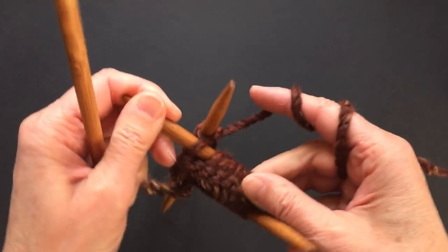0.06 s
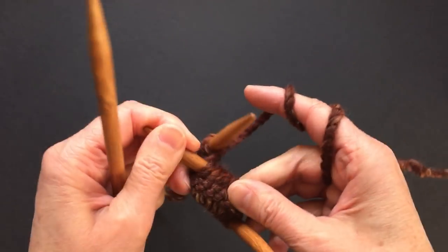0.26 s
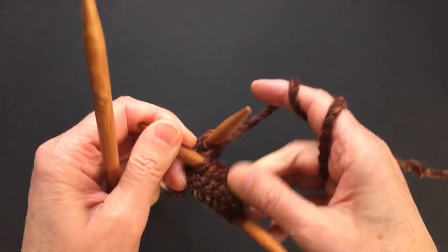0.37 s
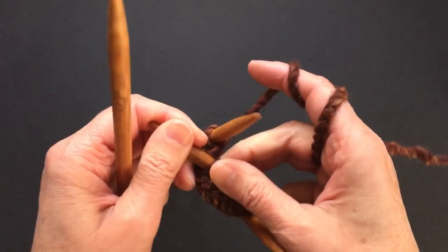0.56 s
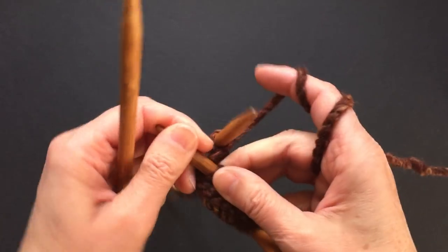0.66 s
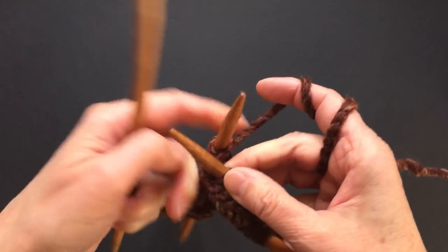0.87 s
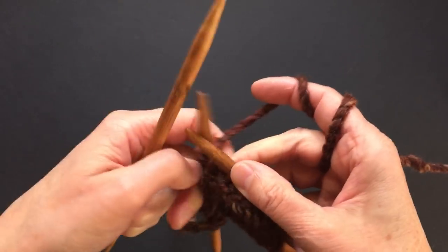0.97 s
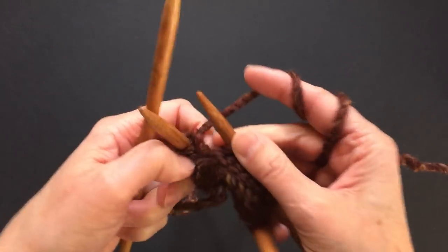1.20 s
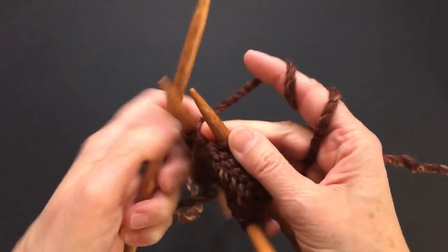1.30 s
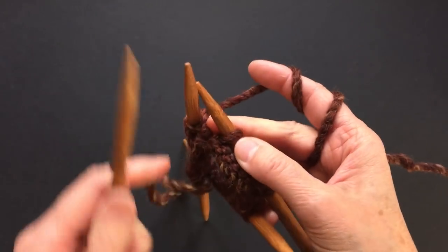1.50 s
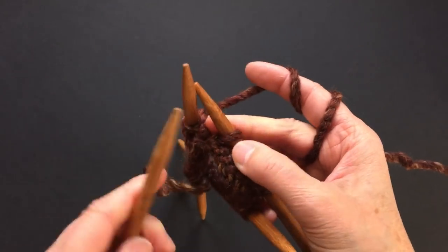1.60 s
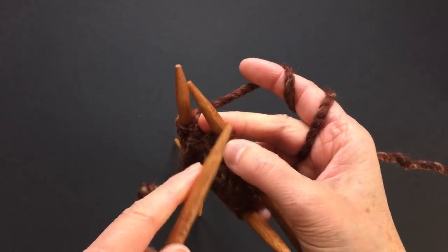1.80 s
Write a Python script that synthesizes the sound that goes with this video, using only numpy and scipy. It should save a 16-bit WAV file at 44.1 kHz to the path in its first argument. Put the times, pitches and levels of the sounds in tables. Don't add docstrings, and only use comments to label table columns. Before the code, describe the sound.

Wooden knitting needles, close to the microphone in a quiet room with faint low hum. Near silence, then clicks at 0.2 to 0.3 seconds with a strong yarn hiss and scrape. Small ticks near 0.47, a sharp knock at 0.7, rapid rattle to 0.82. Thinner, brighter taps around 1.07 and 1.13, dense scraping chatter with soft hand bumps from 1.33 to 1.45, a crisp knock at 1.57, then quiet.

```python
import sys
import numpy as np
from scipy import signal
from scipy.fft import rfft, irfft
from scipy.io import wavfile

SR = 44100
rng = np.random.default_rng(int(sys.argv[2]) if len(sys.argv) > 2 else 0)


def attenuation_scalar(level_db):
    decades = np.asarray(level_db, float) / 20
    return 10 ** decades


def transcribe(u):
    v = np.clip(np.atleast_2d(u).T, -1, 1)
    q = np.round(v * 32767).astype(np.int16)
    wavfile.write(sys.argv[1], SR, q)


N = 81585


def rms_one(x):
    return x / np.sqrt(np.mean(x ** 2) + 1e-24)


def ring(force, hz, t60_s):
    r = attenuation_scalar(-60 / (t60_s * SR))
    w = 2 * np.pi * hz / SR
    return signal.lfilter([0, np.sin(w)], [1, -2 * r * np.cos(w), r * r], force + 1e-18)


def narrow(hz, width_hz):
    t60_s = np.log(1000) / np.pi / width_hz
    once = ring(rng.standard_normal(N + SR), hz, t60_s)
    return rms_one(ring(once, hz, t60_s)[SR:])


def drift(rate_hz):
    r = np.exp(-2 * np.pi * rate_hz / SR)
    return rms_one(signal.lfilter([1], [1, -2 * r, r * r], rng.standard_normal(N + SR))[SR:])


def coloured(spectrum):
    hz, db = np.transpose(spectrum)
    log_hz = np.log(np.fft.rfftfreq(N, 1 / SR) + 1)
    gain = attenuation_scalar(np.interp(log_hz, np.log(hz), db, left=-90))
    return rms_one(irfft(rfft(rng.standard_normal(N)) * gain, N))


# (time [s], level [dB])
HUM_LEVEL = [(0, -71), (.2, -66.5), (0.402, -81.5), (0.548, -59), (.65, -69.5), (0.749, -68.5), (.95, -67),
             (1.102, -99), (1.3, -60.5), (1.551, -66.5), (1.85, -67.5)]


def hum():
    hum_hz, width_hz, skirt_db, wander_rad = 117.9, 1.8, -55.5, 0.56
    t = np.arange(N) / SR
    tone = np.sqrt(2) * np.sin(2 * np.pi * hum_hz * t + wander_rad * drift(1.0))
    level_db = np.interp(t, *np.transpose(HUM_LEVEL))
    return attenuation_scalar(level_db) * (tone + attenuation_scalar(skirt_db) * narrow(hum_hz, width_hz))


# (frequency [Hz], width [Hz], level [dB])
RESONANCES = [
    (62.6, 22, -86),
    (185.6, 33, -72),
    (360, 47, -78),
]


def rumble():
    return sum(attenuation_scalar(db) * narrow(hz, width_hz) for hz, width_hz, db in RESONANCES)


# (frequency [Hz], density [dB/Hz])
ROOM_SPECTRUM = [(15, -63), (25, -35), (127, 10.5), (363, -5.5), (818, -12.5), (1890, -18), (2480, -18),
                 (2840, -18), (16000, -36.5)]


def room_tone():
    return attenuation_scalar(-69) * coloured(ROOM_SPECTRUM)


def bending(force, modes, grip, pitch):
    scatter_db, detune_hz = 2.0, 40
    out = 0
    for k, ((hz, db, t60_s), (strength, shift)) in enumerate(zip(modes, grip)):
        mode_hz = pitch * (hz + detune_hz * shift)
        out = out + (-1) ** k * attenuation_scalar(db + scatter_db * strength) * ring(force, mode_hz, t60_s)
    return rms_one(out)


# (frequency [Hz], level [dB], t60 [s])
HELD_MODES = [(1200, -8, 0.008), (1600, -1, 0.006), (1890, 1, 0.011), (2170, 1.5, 0.013), (2510, 4, 0.014),
              (2835, 0, 0.011), (3300, 4, 0.005), (3860, -5, 0.01), (4500, -4, 0.006), (5200, 1, 0.004),
              (6270, -13, 0.01), (6900, -16, 0.012)]
# (frequency [Hz], level [dB], t60 [s])
FREE_MODES = [(2400, 0, .018), (3100, -9, .008), (4350, 0, .015), (6100, -5, .01), (6900, -1, .013),
              (7600, -13, .01), (8250, -18, .012), (9450, 0, .018), (11300, -15, .012), (12300, -3, .012),
              (13400, -10, .01), (15200, -6, .012)]
# (time [s], pitch ratio [1])
GRIP_PITCH = [(0, 1.0), (1.0, 1.0), (1.06, 1.05), (1.085, 1.05), (1.11, 1.09), (1.13, .98), (1.3, 1.0),
              (1.85, 1.0)]


def wood(force, centre_oct, width_oct, free, grips, direct_db, time_s):
    octave = np.log2(np.fft.rfftfreq(len(force), 1 / SR) / 2000 + 1e-3)
    off = (octave - centre_oct) / width_oct
    steep = np.where(off > 0, 1, min(3 * free, 1))
    colour_db = -80 * np.tanh((1.4 * off ** 2 + steep * off ** 4) / 30)
    colour_db = colour_db - 30 * (octave < min(-1.2, centre_oct - 1))
    force = irfft(rfft(force) * attenuation_scalar(colour_db), len(force))
    held = bending(force, HELD_MODES, grips[0], 1)
    loose = bending(force, FREE_MODES, grips[1], np.interp(time_s, *np.transpose(GRIP_PITCH)))
    free = np.clip(free, 0, 1)
    return (1 - free) * (held + attenuation_scalar(direct_db) * rms_one(force)) + free * loose


def random_grips(count):
    return rng.standard_normal((count, 2, len(HELD_MODES), 2))


def stroke(start_s, length_s, rise):
    u = np.clip((np.arange(N) / SR - start_s) / length_s, 0, 1)
    return np.sin(np.pi / 2 * np.minimum(u / rise, (1 - u) / (1 - rise)))


def stick_slip(strokes, free):
    slips_per_s, spread_db, lump_db, lump_hz = 3500, 3.0, 2.2, 80
    rise, flatness, direct_db = .35, 2.0, -9
    grips = random_grips(len(strokes))
    happens = rng.random(N) < slips_per_s / SR
    sign = rng.choice([-1, 1], N)
    size = attenuation_scalar(spread_db * np.minimum(rng.exponential(1, N), 3))
    slips = happens * sign * size * attenuation_scalar(lump_db * drift(lump_hz))
    out = np.zeros(N + SR)
    for (start_s, length_s, db, centre_oct, width_oct), grip in zip(strokes, grips):
        force = slips * np.minimum(flatness * stroke(start_s, length_s, rise) ** 2, 1)
        i = max(int((start_s - .005) * SR), 0)
        force = np.r_[force, np.zeros(SR)][i:i + 8192]
        middle_s = start_s + length_s / 2
        sound = wood(force, centre_oct, width_oct, free, grip, direct_db, middle_s)
        out[i:i + len(force)] += attenuation_scalar(db) * sound * np.sqrt(len(force) / SR / length_s)
    return out[:N]


# (start [s], length [s], level [dB], colour centre [oct over 2 kHz], colour width [oct])
HELD_SCRAPES = [(.001, 0.033, -82, 0.18, 0.72), (.035, 0.019, -81.5, 0.57, 0.39),
                (.249, 0.088, -55, 0.47, 0.69), (.325, 0.058, -58.5, 0.38, 0.51),
                (.477, 0.011, -71, 0.3, 0.32), (.746, 0.042, -54, .15, 0.65),
                (.755, 0.038, -67, 1.79, 0.54), (.865, 0.039, -76.5, 0.2, 0.49),
                (1.337, 0.1, -51, 0.78, 0.94), (.71, 0.059, -65, 0.46, 0.36),
                (1.415, 0.041, -70.5, 1.17, 0.6), (1.125, 0.02, -72, 3.44, 1),
                (1.452, 0.042, -68, 1.3, 0.77), (1.575, 0.085, -72.5, .6, 0.8)]
# (start [s], length [s], level [dB], centre [oct], width [oct])
HELD_SQUEAKS = [
    (1.272, .06, -90, .2, .07),
    (1.487, .02, -77, .1, .05),
    (.36, .075, -73, .1, .08),
    (.49, .065, -79, .33, .05),
]


def scrapes():
    return stick_slip(HELD_SCRAPES + HELD_SQUEAKS, free=.12)


def knocks(contacts):
    lead = 256
    pulse = 1. * (np.arange(4096) == lead)
    out = np.zeros(N + SR)
    for (time_s, db, centre_oct, width_oct, free), grip in zip(contacts, random_grips(len(contacts))):
        hit = wood(pulse, centre_oct, width_oct, free, grip, 0.7, time_s)
        i = int(time_s * SR) - lead
        out[i:i + len(hit)] += attenuation_scalar(db) * hit / np.abs(hit).max()
    return out[:N]


# (time [s], peak [dB], colour centre [oct over 2 kHz], colour width [oct], free share [0-1])
NEEDLE_TAPS = [(.0395, -41, .35, .4, .2), (.046, -46, .2, .5, .1), (.2172, -23, .15, .6, .1),
               (.2515, -37, .2, .6, .1), (.2785, -24, .2, .55, .1), (.4555, -35, .33, .3, .3),
               (.484, -34, .33, .3, .3), (.6993, -17.5, .2, .5, .05), (.7012, -28, .3, .4, .1),
               (.7585, -31, .1, .6, .1), (.763, -27, .4, .75, .05), (.8208, -20.5, .4, .75, .05),
               (1.0688, -31.5, 1.05, .8, .6), (1.1348, -29, .75, .9, .75), (1.145, -50, 1.5, 1.3, .6),
               (1.3215, -62, 1.1, 1.3, .3), (1.3432, -27, .6, .8, .2), (1.3875, -31, .3, .65, .1),
               (1.409, -35, .5, .7, .1), (1.4525, -34, .9, .9, .2), (1.469, -52, 2.1, .9, .9),
               (1.5687, -21, .45, .8, .03), (1.577, -40, .6, .65, .2)]


def taps():
    return knocks(NEEDLE_TAPS)


# (start [s], length [s], level [dB rms])
YARN_SLIDES = [
    (0.17, 0.081, -62),
    (0.219, 0.15, -38),
    (0.766, 0.024, -56.5),
    (1.325, 0.1, -53.5),
    (1.431, 0.082, -61),
]
# (frequency [Hz], density [dB/Hz])
YARN_SPECTRUM = [(2060, -61), (3500, -6), (5900, -3), (7750, -5), (10900, -4), (14900, -5.5), (16000, 5)]


def yarn():
    flicker_db, flicker_hz = 2, 120
    pull = sum(attenuation_scalar(db) * stroke(start_s, length_s, 0.5) ** 2 for start_s, length_s, db in YARN_SLIDES)
    return pull * attenuation_scalar(flicker_db * drift(flicker_hz)) * coloured(YARN_SPECTRUM)


# (start [s], length [s], level [dB], colour centre [oct over 2 kHz], colour width [oct])
FREE_GLIDES = [(.18, 0.089, -75.5, 4.26, 0.23), (.635, 0.027, -96.5, 1.55, 0.42),
               (.70, 0.024, -89.5, 0.52, 1.5), (.765, 0.086, -73.5, 1.03, 0.97),
               (.875, 0.02, -100, 1.7, 1.2), (1.02, 0.074, -83.5, 1.3, 2.7),
               (1.068, 0.055, -72.5, 0.84, 0.93), (1.10, 0.042, -84, 2.7, 0.11),
               (1.345, 0.091, -68.5, 1.8, 2.5), (1.465, 0.076, -79, 0.87, 1.07),
               (1.628, 0.044, -69.5, 2.32, 0.53), (1.745, 0.095, -90, 2.2, 2.2),
               (1.092, 0.047, -71.5, 1.19, 0.68)]


def glides():
    return stick_slip(FREE_GLIDES, free=.92)


# (time [s], peak [dB], pitch [Hz], t60 [s])
HAND_BUMPS = [(.70, -57, 360, 0.21), (0.821, -56, 330, 0.14), (1.335, -47.5, 219, 0.039),
              (1.343, -48, 456, 0.11), (1.39, -56.5, 337, 0.13), (0.217, -57, 290, 0.043),
              (1.57, -51, 391, 0.055), (1.57, -47.5, 135, 0.064), (1.761, -60, 86, 0.092),
              (1.134, -63, 930, 0.034), (1.349, -58, 697, 0.017)]


def bumps():
    t = np.arange(N) / SR
    out = np.zeros(N)
    for time_s, db, hz, t60_s in HAND_BUMPS:
        u = np.maximum(t - time_s, 0)
        body = np.sin(2 * np.pi * u * hz) + attenuation_scalar(1.0) * narrow(hz, 1.01 * hz)
        onset = 1 - np.exp(-2.5 * u * hz)
        out += attenuation_scalar(db) * body * onset * attenuation_scalar(-60 * u / t60_s)
    return out


# (time [s], peak [dB], colour centre [oct over 2 kHz])
CHATTER = [(.7492, -38, .3), (0.7535, -34, 0.099), (0.7543, -37, .3), (0.7591, -28.5, 0.52),
           (0.7678, -35, 0.35), (0.7682, -25.5, 0.23), (0.7724, -26.5, 0.22), (0.7745, -24.5, 0.34),
           (.7783, -28, 0.3), (0.7819, -37, .3), (.790, -41, 0), (0.2661, -34, 0.16), (0.2816, -37.5, 0.12),
           (0.2853, -36, 0), (0.3326, -40, 0.39), (0.3445, -36.5, .2), (.352, -41, 0.41), (.360, -40, 0.37),
           (0.4799, -40.5, 0.38), (.487, -46, 0.56), (0.7076, -32.5, 0.14), (.711, -32, 0.54),
           (1.3447, -35, 0.31), (1.3471, -37, 0.3), (1.3512, -31.5, 0.6), (1.355, -36, 1),
           (1.3603, -28, 0.3), (1.3633, -31, .6), (1.366, -31, 0.35), (1.371, -28.5, 1),
           (1.3766, -33, 0.29), (1.3955, -39, 0.11), (1.3962, -29, .5), (1.4005, -35, 0.75),
           (1.4028, -28.5, 0.76), (1.407, -29, 0.82), (1.4127, -32.5, 0.69), (1.42, -43, 1),
           (1.14, -46, 0.24), (1.1437, -48, 0.066), (1.5708, -32, 0.73), (1.581, -41, 0.84),
           (1.603, -48, 0.41)]


def rattles():
    width_oct, free = .55, .05
    return knocks([(time_s, db, centre_oct, width_oct, free) for time_s, db, centre_oct in CHATTER])


# (delay [s], level [dB])
EARLY_ECHOES = [
    (.0016, -34.5),
    (.008, -17.5),
]


def room(x):
    t60_s, tail_db, cut_hz, onset_s = 0.15, -16, 4300, 0.0028
    t = np.arange(SR // 2) / SR
    tail = rng.standard_normal(len(t)) * attenuation_scalar(-60 * t / t60_s) * np.clip(t / onset_s, 0, 1)
    tail = signal.lfilter(*signal.butter(1, cut_hz, fs=SR), tail)
    tail = attenuation_scalar(tail_db) * tail / np.sqrt(np.sum(tail ** 2))
    for delay_s, db in EARLY_ECHOES:
        tail[int(delay_s * SR)] += attenuation_scalar(db)
    return x + signal.fftconvolve(x, tail)[:N]


def scene():
    near = taps() + scrapes() + glides() + yarn() + rattles()
    return (room(near) + bumps() + hum() + rumble() + room_tone())[None]


def top_cut(x):
    return signal.sosfilt(signal.butter(12, 16300, fs=SR, output="sos"), x)


def record(dry):
    top_hz, low_hz = 16600, 55
    mix = signal.sosfilt(signal.cheby2(12, 70, top_hz, fs=SR, output="sos"), dry)
    mix = signal.sosfilt(signal.butter(4, low_hz, "high", fs=SR, output="sos"), mix)
    return top_cut(mix)


dry = scene()
out = record(dry)
transcribe(out)
```